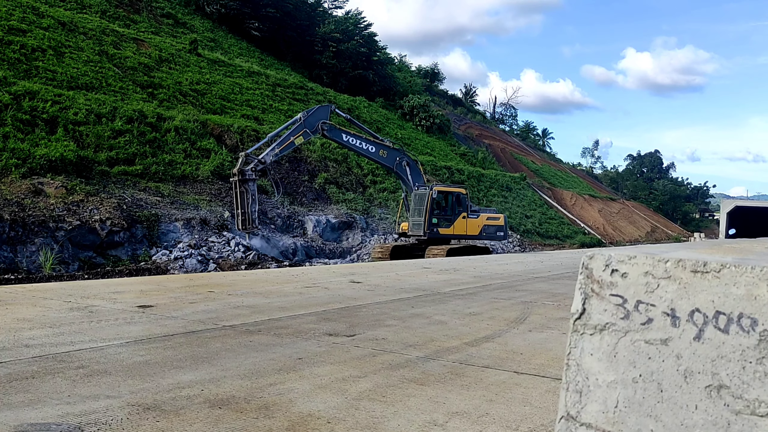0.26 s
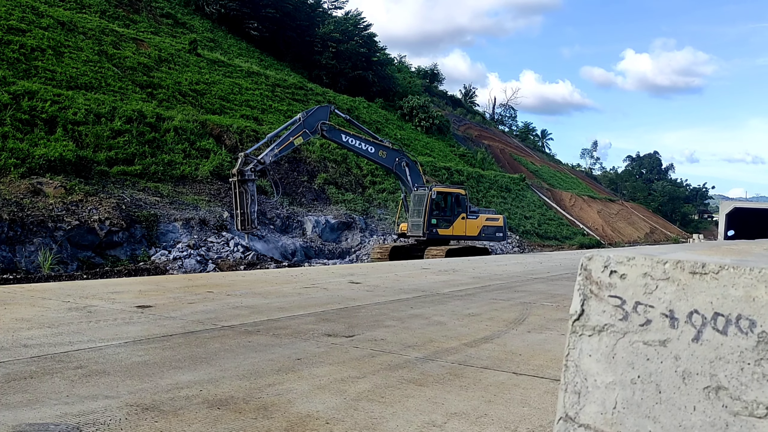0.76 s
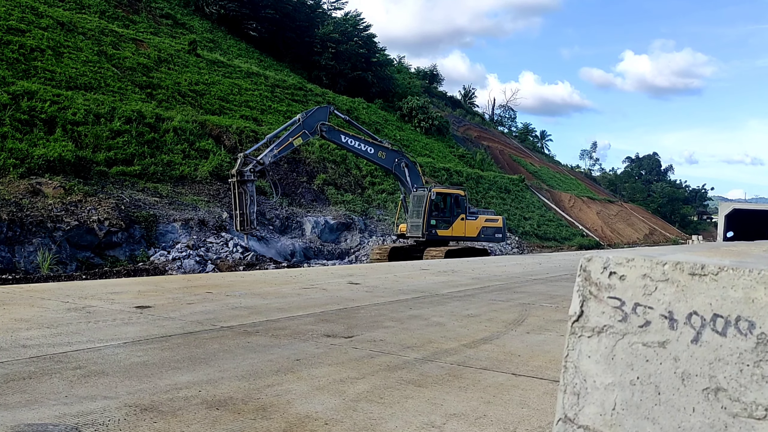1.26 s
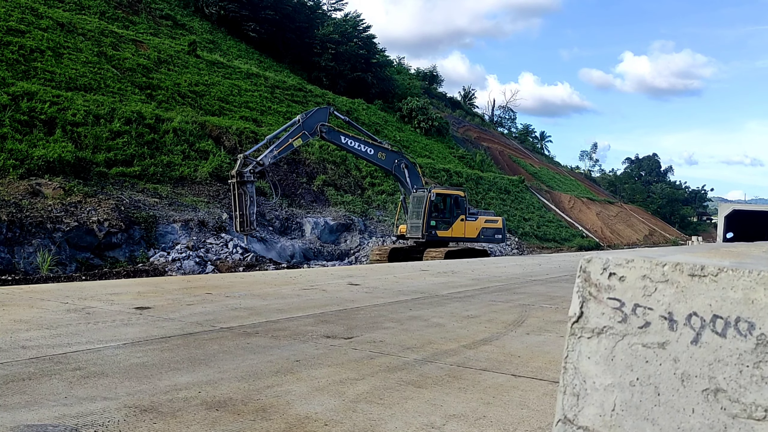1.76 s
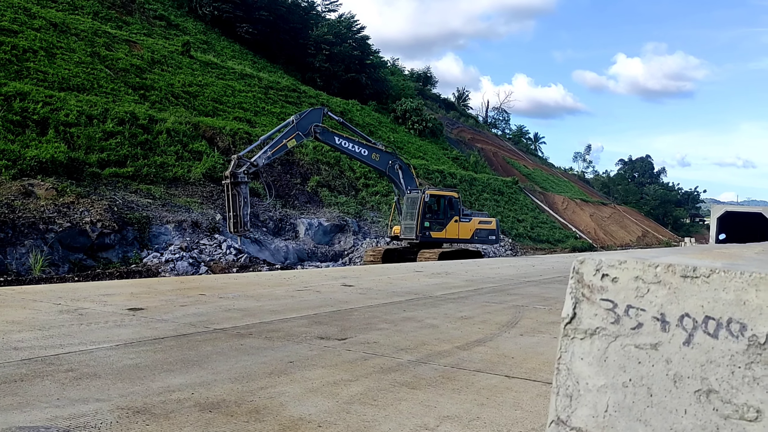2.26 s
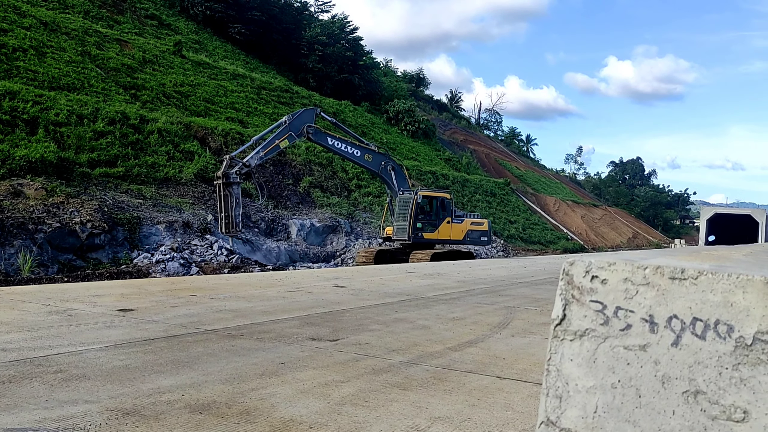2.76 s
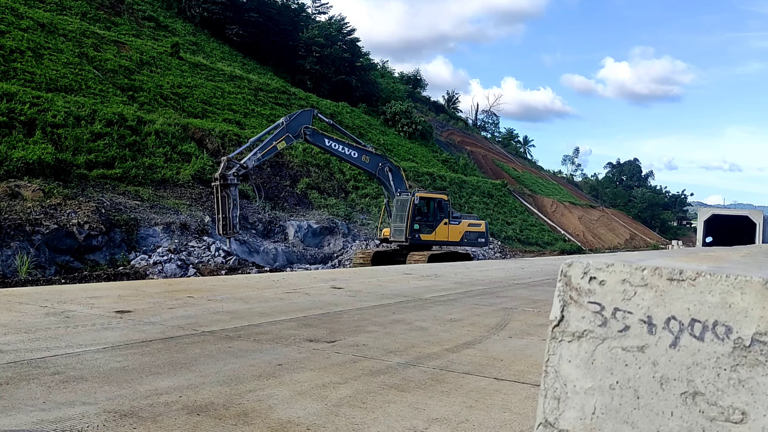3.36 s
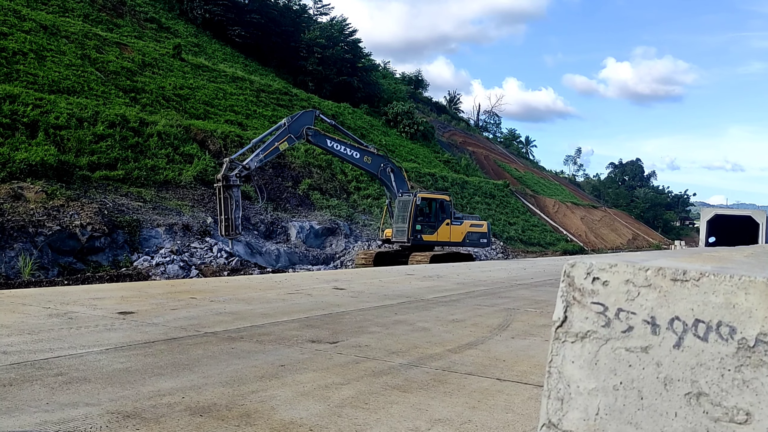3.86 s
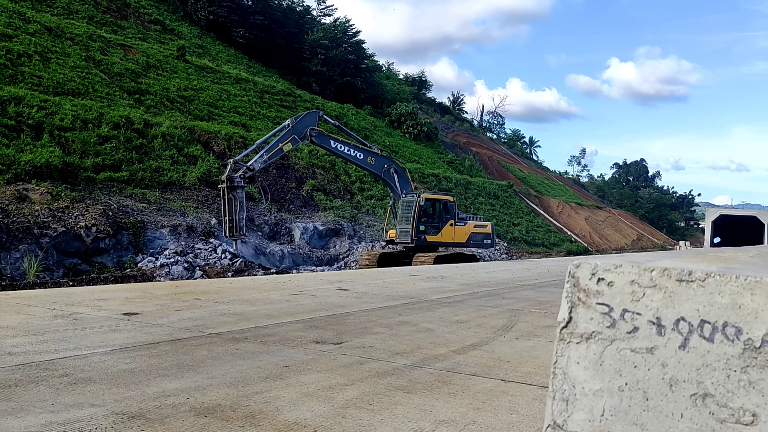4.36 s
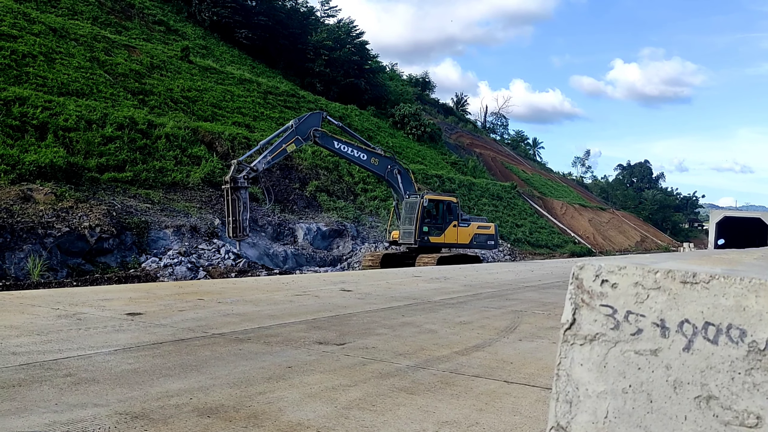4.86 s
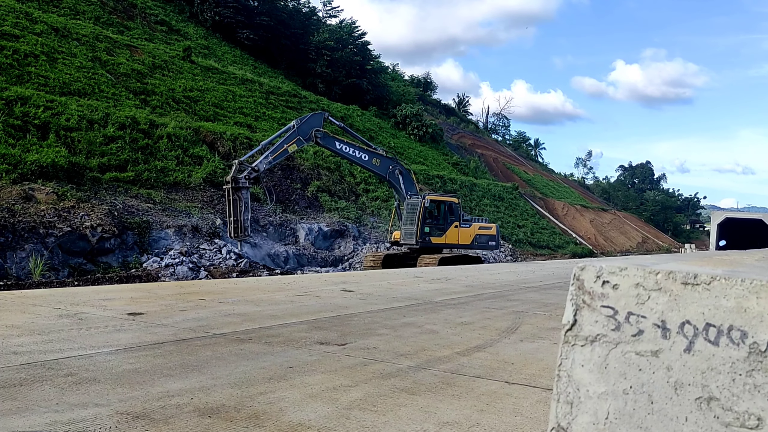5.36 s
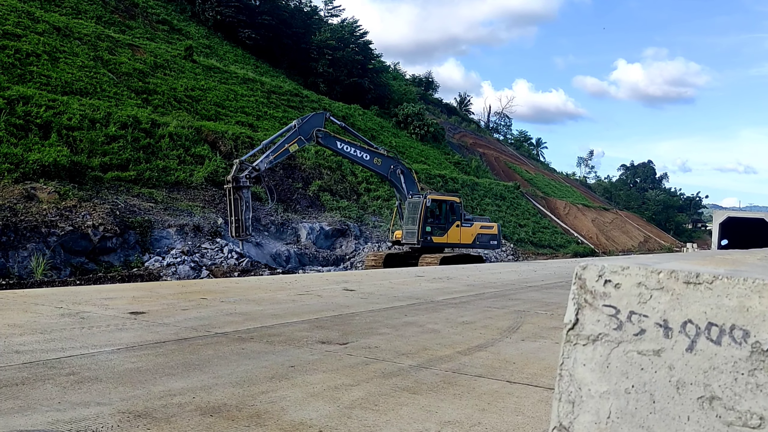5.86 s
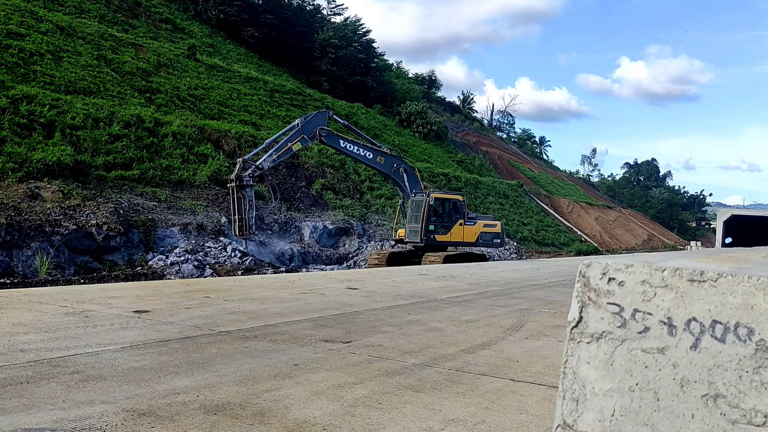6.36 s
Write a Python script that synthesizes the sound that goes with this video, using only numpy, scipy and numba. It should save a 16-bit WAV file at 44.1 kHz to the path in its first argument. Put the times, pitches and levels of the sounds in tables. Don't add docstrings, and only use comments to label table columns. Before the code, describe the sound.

A rock breaker on an excavator works about thirty metres away across open concrete beside a slope. From 0.05 s hard steel clangs strike stone, roughly every 0.13 s, with a missed beat near 0.45 s. Each has a faint valve hiss and knock some 27 ms ahead, then a bright chisel ring, rock crack, housing thud, grit spray and patchy scattered tail. The last blow of the run falls at 1.4 s. Until 2.4 s only fading echoes, low diesel rumble, a pump hum near 205 Hz and faint site noise remain. Hammering resumes at 2.4 s, about seven blows per second, with gaps near 3.65, 5.55 and 6.0 s. From about 4 s the tip bites deeper: more crack and boom hum, less loose ping. The final blows after 6.25 s are strongest, continuing to the end at about 6.6 s. Gain control squeezes the stereo sound.

```python
import sys
import numpy as np
from scipy import signal
from scipy.fft import rfft, irfft
from scipy.io import wavfile
from scipy.ndimage import uniform_filter1d, map_coordinates
from numba import njit

SR = 44100
rng = np.random.default_rng(int(sys.argv[2]) if len(sys.argv) > 2 else 0)


def amp(db):
    return 10 ** (np.asarray(db, float) / 20)


def write(x):
    x = np.atleast_2d(x).T
    wavfile.write(sys.argv[1], SR, np.round(np.clip(x, -1, 1) * 32767).astype(np.int16))


N = 291060

# pitch_hz, level_db, t60_s
HOUSING_MODES = [(604, -7.5, 0.36), (783, -11, 0.13), (845, 9, 0.055), (985, 4, 0.038)]
ROCK_MODES = [(1000, -13, 0.094), (1174, 2, 0.05), (1314, 0.5, 0.032), (1413, -6.5, 0.078)]
BRACKET_MODES = [(1602, -5, 0.094), (1750, 7.5, 0.043), (1830, -15, 0.11), (2180, 0, 0.029)]
CHISEL_MODES = [(3425, 0.5, 0.11), (3890, -1.5, 0.11), (4040, 7, 0.018), (4340, -2, 0.057),
                (4900, -5, 0.038), (5090, -26, 0.29), (5180, 0, 0.1), (6000, 0, 0.19), (6403, 7, 0.056),
                (6640, -43, .15), (7700, -4, 0.099), (8250, -0.5, 0.18), (9100, -31, .12),
                (9900, -6, 0.067), (10700, -4.5, 0.13), (11940, -6, 0.19), (13500, -23, 0.04),
                (14700, -24, 0.06), (15300, -12, 0.16)]
KNOCK_MODES = [(1270, -3.5, 0.0088), (1409, -4, 0.063), (1754, -10, 0.058)]
GROUND_MODES = [(115, -28, 0.0077), (181, 4, 0.023), (266, -3.5, 0.17), (342.5, 2.5, 0.12)]
CASING_MODES = [(1775, 0, 0.1), (3340, -5, 0.095), (4264, -11, 0.06), (5165, -8, 0.081), (5313, 2, 0.076),
                (6300, -4.5, 0.051), (7520, -11, 0.11), (8161, -0.5, 0.1), (9600, -8, 0.078),
                (10560, -4, 0.069), (11200, -10.5, .1), (15040, -18, .1)]

# frequency_hz, level_db (per Hz)
GRIT_COLOUR = [(290, -52), (500, -0.5), (831, -8), (1820, -5), (2460, -10), (3860, -8.5), (6510, -12),
               (8830, -16.5), (12000, -17.5), (15100, -35), (16000, -57)]
HISS_COLOUR = [(410, -25), (700, 9.5), (1730, -3), (2840, -11), (3600, 0.5), (5120, 5), (5610, 2.5),
               (6570, -1), (10500, 0.5), (16000, -17.5)]
SLOPE_COLOUR = [(290, -7), (500, -14), (1030, -2), (1230, -1), (1740, 5), (2130, -16), (3920, -0.5),
                (7210, -11), (11000, -14), (14900, -34), (16000, -71)]
ENGINE_COLOUR = [(15, -80), (34, -58), (59, -10.5), (92, -24.5), (136, -7.5), (165, -7.5), (186, -6.5),
                 (202, -3.5), (316, -8), (381, -5.5), (415, -1), (476, -13), (1500, -29.5), (1950, -74.5),
                 (3300, -120)]
SITE_COLOUR = [(710, -5.5), (1200, -19), (1460, -6.5), (3610, -21.5), (6370, -27), (11000, -30.5),
               (15500, -40)]
RUBBLE_COLOUR = [(300, -3), (520, -1), (800, 4.5), (1200, 0.5), (1800, -11), (2600, -5.5), (4500, -13),
                 (8000, -36)]

# time_s, level_db
ENGINE_LOAD = [
    (0.0, -23),
    (0.44, -24),
    (0.68, -25.5),
    (1.34, -27),
    (1.75, -29.5),
    (2.81, -27),
    (3.82, -26.5),
    (4.87, -24.5),
    (5.68, -26.5),
    (6.6, -24),
]

# frequency_hz, phase_rad
PORT_LEAD = [(0, 0), (1460, 0.1), (2500, 3.7), (3360, 4.2), (3880, 6.1), (5000, 6.1), (5510, 9.5),
             (7240, 12.3), (7750, 12.4), (8530, 15.3), (10600, 18.2), (12900, 15.9), (13600, 17.0),
             (16000, 19.5)]
# frequency_hz, difference_db
PORT_TILT = [(60, 0.5), (110, 0.5), (200, 0.5), (380, 1.0), (700, 0.0), (1290, -3.0), (2380, 0.5),
             (4400, -1.0), (8120, 1.0), (15000, 12.0)]
# frequency_hz, likeness (0-1)
PORT_LIKENESS = [(60, 0.95), (130, 0.99), (290, 0.97), (640, 0.88), (1410, 0.54), (3100, 0.15),
                 (6820, 0.38), (15000, 0.03)]

# blow_s, strength_db, valve_lead_ms, knock_db
HAMMER_CYCLES = [
    (0.0515, -17, 21.5, 1),
    (0.1882, -17, 25, 4),
    (0.321, -17, 25, 2),
    (0.5869, -16.5, 27.2, 12.5),
    (0.7443, -18, 29, 4),
    (0.882, -16.5, 30, -1),
    (1.014, -18.5, 27.2, 3),
    (1.1433, -18, 28.4, 2.5),
    (1.2721, -19, 26.7, 5),
    (1.3993, -18.5, 27, 0),
                 (2.4115, -17, 28.7, 0), (2.5592, -18.5, 30, 4), (2.7043, -18, 29, 0),
                     (2.847, -17, 27.4, -6), (2.9865, -17.5, 26, -17), (3.1245, -17, 29, -14),
                     (3.2571, -18.5, 27, -18), (3.3891, -16.5, 27, -6), (3.5404, -18, 28, 9),
                     (3.795, -17, 28.6, -2), (3.938, -17, 28, 0), (4.0759, -16.5, 25, -3),
                     (4.2138, -17.5, 27.1, 5), (4.3479, -17, 26.9, 2), (4.4847, -17, 28, -6),
                     (4.62, -16.5, 27.5, 5), (4.753, -17.5, 26.8, 4.5), (4.8875, -17.5, 28.8, 3),
                     (5.0199, -17.5, 24, -29), (5.1543, -17, 28, -4), (5.2854, -16.5, 28.6, 4),
                     (5.4272, -17, 27.4, -25), (5.7061, -18, 28, 3), (5.853, -16.5, 24.4, 4),
                     (6.129, -17, 29.2, 4), (6.273, -15.5, 28, 4), (6.4087, -15, 27, -3),
                     (6.5447, -15, 29.5, 3)]
# time_s, depth (0 skating, 1 buried), boom_weight_db
TIP_BITE = [(0.0, 0.18, -5), (1.0, 0.24, -7.5), (1.4, 0.27, -2.5), (2.4, 0.25, -2), (3.1, 0.58, -0.8),
            (3.6, 0.4, -1), (4.1, 0.94, -3.5), (4.9, 1.08, -5.5), (5.8, 0.93, 1), (6.2, 1.25, -11.5),
            (6.6, 0.78, -3)]


def along(table, hz):
    points_hz, values = np.transpose(table)
    return np.interp(np.log(hz + 1), np.log(points_hz + 1), values)


def noise(colour, patchy_db, patch_hz):
    hz = np.arange(N // 2 + 1) * SR / N
    alike = np.clip(along(PORT_LIKENESS, hz), 0, 1)
    mid, side = rfft(rng.standard_normal((2, N)))
    mid = mid * np.sqrt(1 + alike)
    side = side * np.sqrt(1 - alike)
    crowd = np.interp(hz / patch_hz, np.arange(N // 100), rng.standard_normal(N // 100))
    spectrum = np.array([mid + side, mid - side]) * amp(along(colour, hz) + patchy_db * crowd)
    x = irfft(spectrum, N)
    return x / np.sqrt(np.mean(x ** 2))


def patches(x, depth_db, cell_hz, cell_s):
    hz, s, z = signal.stft(x, SR, nperseg=1024, noverlap=768)
    luck = rng.standard_normal((200, 1500))
    places = np.meshgrid(hz / cell_hz, s / cell_s, indexing="ij")
    cells = map_coordinates(luck, places, order=1, mode="wrap")
    return signal.istft(z * amp(depth_db * cells), SR, nperseg=1024, noverlap=768)[1][:, :N]


def walk(rate_hz):
    hold = int(SR / rate_hz)
    steps = np.repeat(rng.standard_normal(N // hold + 1), hold)
    return 1.348 * uniform_filter1d(uniform_filter1d(steps, hold), hold)[:N]


def clicks(times, gains):
    x = np.zeros(N)
    np.add.at(x, np.clip((np.asarray(times) * SR).astype(int), 0, N - 1), gains)
    return x


def swell(x, rise_s, t60_s):
    t = np.arange(SR) / SR
    shape = (1 - np.exp(-t / rise_s)) * np.exp(-np.log(1000) * t / t60_s)
    power = signal.fftconvolve(x ** 2, (shape / shape.max()) ** 2)[:N]
    return np.sqrt(np.abs(power))


def ring(modes, times, db, scatter_db, shake):
    out = 0
    luck = rng.standard_normal((len(times), len(modes)))
    rattle = shake * rng.standard_normal(N)
    for k, (hz, mode_db, t60) in enumerate(modes):
        pole = np.exp(2j * np.pi * hz / SR - np.log(1000) / (t60 * SR))
        force = clicks(times, amp(db + scatter_db * luck[:, k])) + rattle
        resonance = signal.lfilter([0, pole.imag], [1, -2 * pole.real, abs(pole) ** 2], force)
        out = out + amp(mode_db) * resonance
    return out


def hum(hz, db, wander_hz, flutter_db, octave_db):
    angle = 2 * np.pi * np.cumsum(hz + wander_hz * walk(25)) / SR
    octave = amp(octave_db + flutter_db * walk(8.8)) * np.sin(2 * angle)
    return np.sqrt(2) * amp(db + flutter_db * walk(18)) * (np.sin(angle) + octave)


def cycles():
    return np.transpose(HAMMER_CYCLES)


def bite(t):
    s, depth, weight_db = np.transpose(TIP_BITE)
    return np.interp(t, s, depth), np.interp(t, s, weight_db)


def share(skating_db, buried_db, depth):
    return skating_db + (buried_db - skating_db) * depth


def site():
    return amp(-40.5) * patches(noise(SITE_COLOUR, 1.5, 120), 6, 110, .05)


def engine():
    s, db = np.transpose(ENGINE_LOAD)
    load_db = np.interp(np.arange(N) / SR, s, db)
    return amp(load_db + 1.72 * walk(20)) * noise(ENGINE_COLOUR, 1.6, 31.75)


def pump_and_boom():
    t = np.arange(N) / SR
    struck = np.append(0, cycles()[0])
    since = t - struck[np.searchsorted(struck, t, side="right") - 1]
    smooth = int(SR / 50)
    dying_db = uniform_filter1d(np.clip(172 * (0.11 - since), -19.5, 0), smooth)
    idle = uniform_filter1d(np.clip((since - 0.08) / 0.18, 0, 1), smooth)
    depth = bite(t)[0]
    boom = hum(327, share(-38, -27, depth) + dying_db, 3, 3, -40)
    hoses = hum(472.7, -32 + dying_db, 5, 4.5, -40)
    arm = hum(751, share(-30.5, -38, depth) + dying_db, 8, 4.5, -40)
    pump_db = -42.5 + (-34 + 42.5) * idle
    pump = hum(205.3, pump_db, 2.5, 2.2, -7)
    return pump + boom + hoses + arm


def slope_tail(s, blow_db):
    near = clicks(np.append(0, s), amp(np.append(-22, blow_db)))
    far = clicks(s + 0.097, amp(blow_db))
    envelope = swell(near, 0.0015, 0.83) + amp(-11) * swell(far, 0.011, 1.7)
    return amp(-14.5) * envelope * patches(noise(SLOPE_COLOUR, 5.6, 70), 7.4, 99.95, .05)


def casing(s, blow_db, depth):
    free = amp(blow_db + share(-47.5, -52.5, depth))
    far = swell(clicks(s + 0.097, free), 0.014, 0.55)
    feed = swell(clicks(s, free), 0.0067, 0.9) + amp(-2) * far
    ports = []
    for port in "LR":
        rings = ring(CASING_MODES, [0], -99, 0, feed)
        ports.append(patches(rings[None], 4.3, 251.3, 0.039)[0])
    return np.array(ports)


def rubble(s, rock_db):
    envelope = swell(clicks(s, amp(rock_db)), 0.037, 0.48)
    return amp(-10.0) * envelope * patches(noise(RUBBLE_COLOUR, 2, 60.9), 4.3, 133.6, .02)


def valve_puffs():
    s, blow_db, lead_ms, knock_db = cycles()
    s = s - lead_ms / 1e3
    hiss_db = blow_db - 2.25
    jet = amp(2.5 * walk(400)) * patches(noise(HISS_COLOUR, 1.5, 200), 2.5, 300, .03)
    hiss = amp(1.0) * swell(clicks(s, amp(hiss_db)), 0.0037, 0.058) * jet
    shake = amp(-27.0) * swell(clicks(s, amp(hiss_db + knock_db)), 0.015, 0.061)
    knock = ring(KNOCK_MODES, s, hiss_db + knock_db - 13, 0.83, shake)
    return hiss + knock


def grit_and_slap(strength):
    grit = swell(strength, 0.0032, 0.072) * amp(4.3 * walk(500)) * noise(GRIT_COLOUR, 2.6, 150.8)
    late = np.roll(strength, int(0.013 * SR))
    texture = patches(noise(GRIT_COLOUR, 3.0, 89.6), 7.2, 130.1, .03)
    slap = amp(-6) * swell(late, 0.0083, 0.094) * texture
    return grit + slap


def loose_ping(s, blow_db, depth):
    luck_db = 2.5 * rng.standard_normal(len(s))
    loose = clicks(s + 0.014, amp(blow_db + share(2.5, -12, depth) + luck_db))
    angle = 2 * np.pi * np.cumsum(5313 + 10 * walk(60)) / SR
    return swell(loose, .015, .07) * amp(1.5 * walk(120)) * np.sin(angle)


def struck_parts(s, blow_db, rock_db, bracket_db, thud_db):
    shake = amp(-36) * swell(clicks(s, amp(thud_db)), .002, .25)
    x = ring(CHISEL_MODES, s + 0.00036, blow_db - 6, 4, amp(-4.0) * shake)
    x = x + ring(ROCK_MODES, s + 0.001412, rock_db + 0.5, 1, shake)
    x = x + ring(BRACKET_MODES, s + 0.0015, bracket_db + 0.5, 1, shake)
    x = x + ring(HOUSING_MODES, s + 0.003693, thud_db - 0.5, 1, shake)
    x = x + ring(GROUND_MODES, s - .008, np.full(len(s), -20.), 0.39, shake)
    return signal.sosfilt(signal.butter(4, 95, "high", fs=SR, output="sos"), x)


def blows():
    s, blow_db = cycles()[:2]
    depth, weight_db = bite(s)
    rock_db = blow_db + share(-9, 2.5, depth)
    bracket_db = blow_db + share(1.5, -10.5, depth)
    scatter = slope_tail(s, blow_db) + casing(s, blow_db, depth) + rubble(s, rock_db)
    burst = grit_and_slap(clicks(s, amp(blow_db))) + loose_ping(s, blow_db, depth)
    return scatter + burst + struck_parts(s, blow_db, rock_db, bracket_db, blow_db + weight_db)


def scene():
    return site() + engine() + pump_and_boom() + valve_puffs() + blows()


@njit
def gain_control(x, top, attack, release, slope):
    gain, e = np.ones(len(x)), 0.
    for i in range(len(x)):
        e += (x[i] - e) * (attack if x[i] > e else release)
        if e > top:
            gain[i] = (top / e) ** slope
    return gain


def top_cut(x):
    return signal.sosfilt(signal.butter(12, 16480, fs=SR, output="sos"), x)


def record(dry):
    hz = np.arange(N // 2 + 1) * SR / N
    lead = np.interp(hz, *np.transpose(PORT_LEAD))
    half = amp(along(PORT_TILT, hz) / 2) * np.exp(.5j * lead)
    x = irfft(rfft(dry) * np.array([half, 1 / half]), N)
    peaks = np.abs(x).max(axis=0)
    gain = gain_control(peaks, amp(-14.5), 1 / (0.013 * SR), 1 / (0.12 * SR), 0.6)
    x = x * gain * amp(1.5)
    x = np.tanh(0.9 * x) / 0.89
    x = signal.sosfilt(signal.ellip(6, .5, 40, 15550, fs=SR, output="sos"), x)
    x = signal.sosfilt(signal.butter(2, 42, "high", fs=SR, output="sos"), x)
    return top_cut(x)


dry = scene()
out = record(dry)
write(out)
```